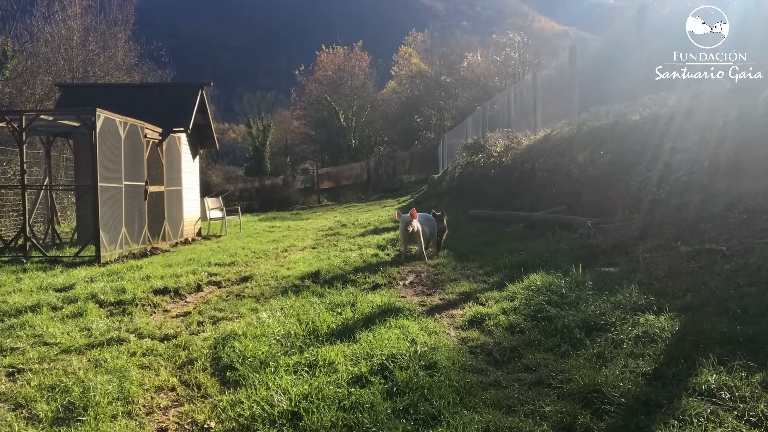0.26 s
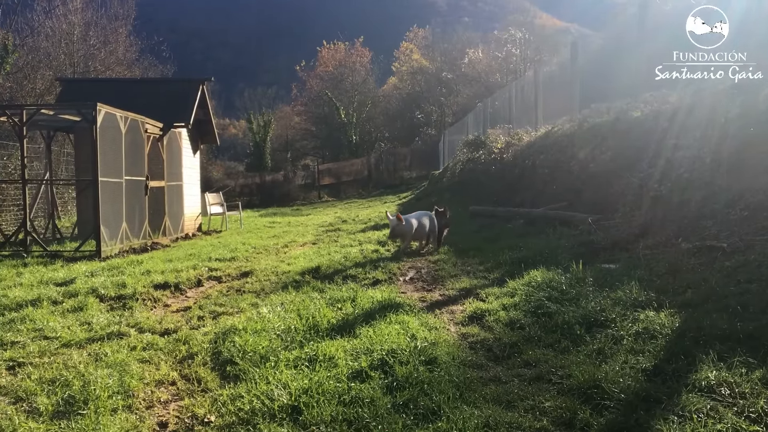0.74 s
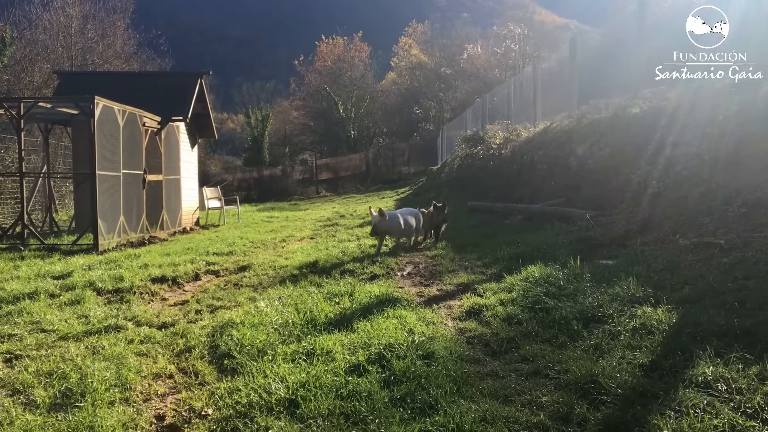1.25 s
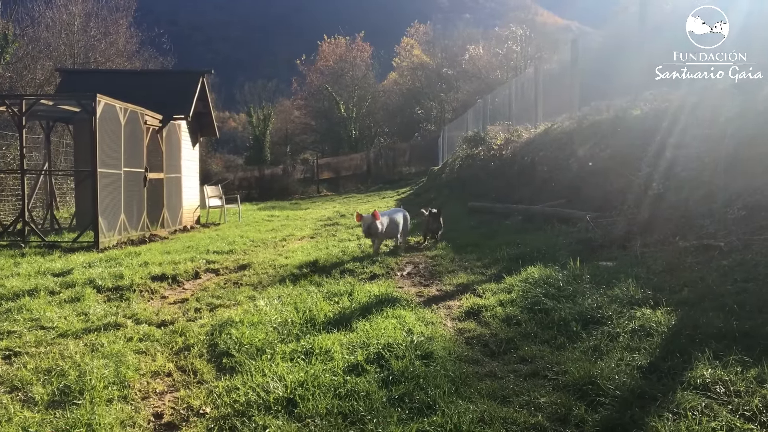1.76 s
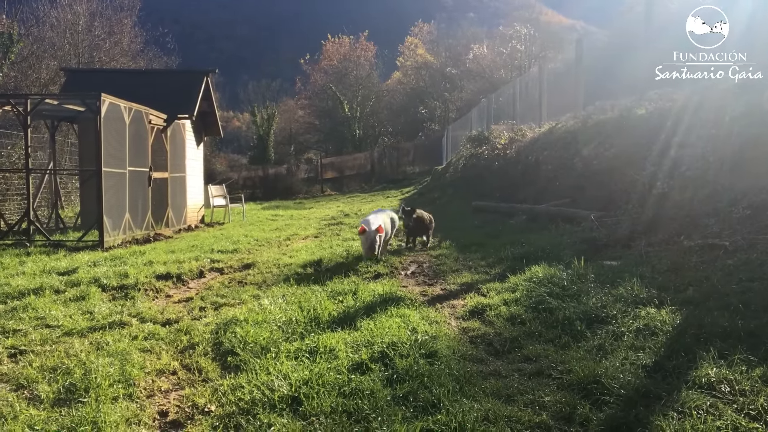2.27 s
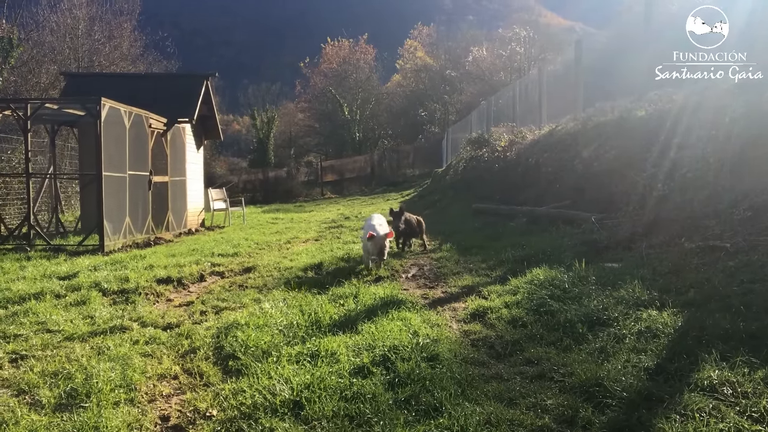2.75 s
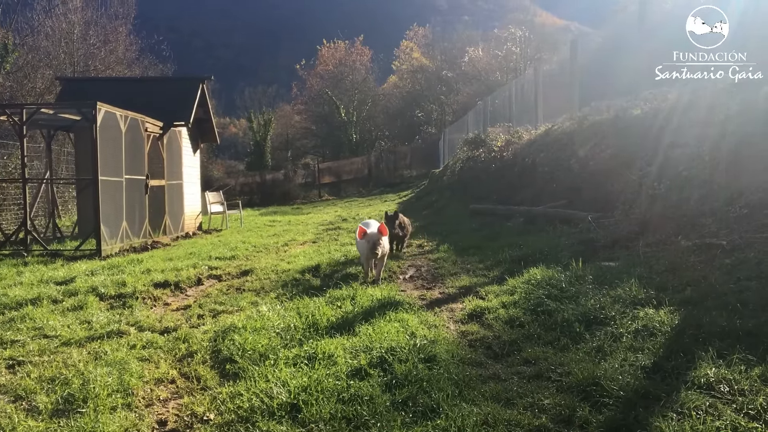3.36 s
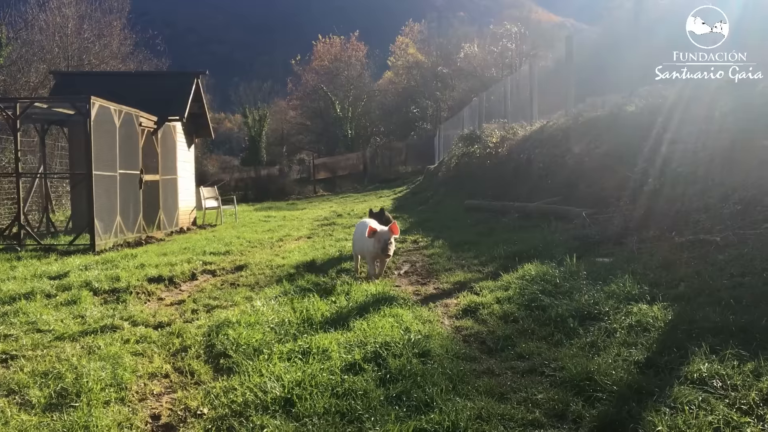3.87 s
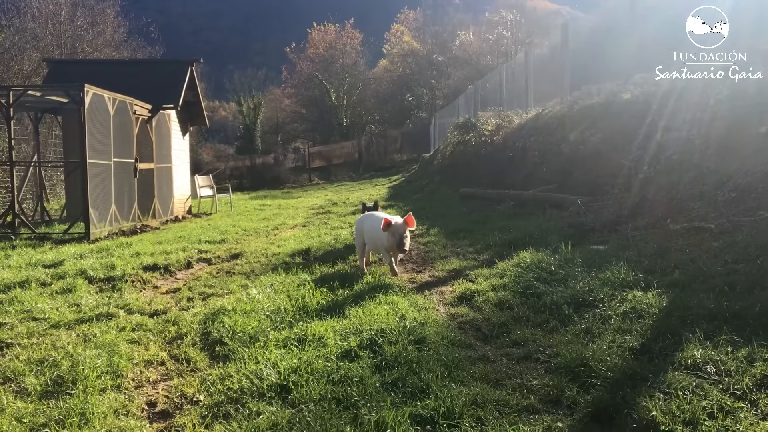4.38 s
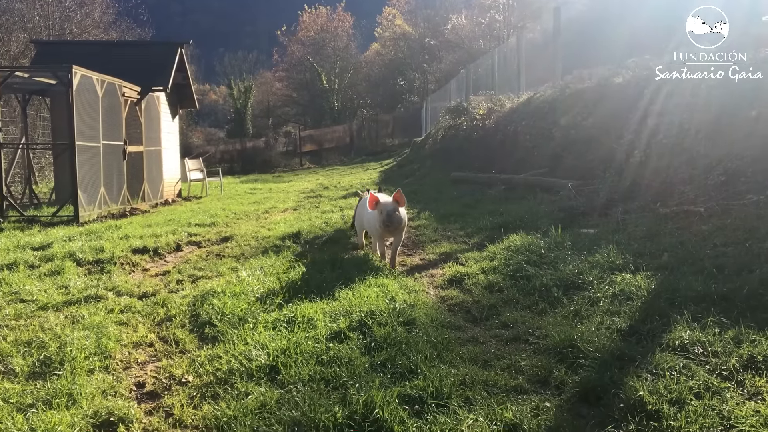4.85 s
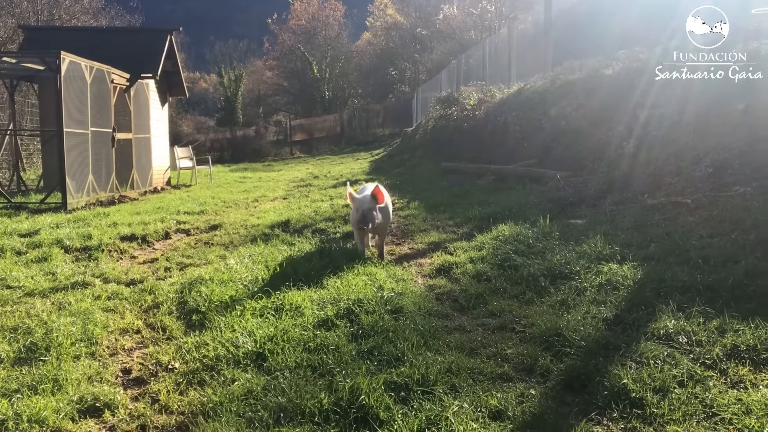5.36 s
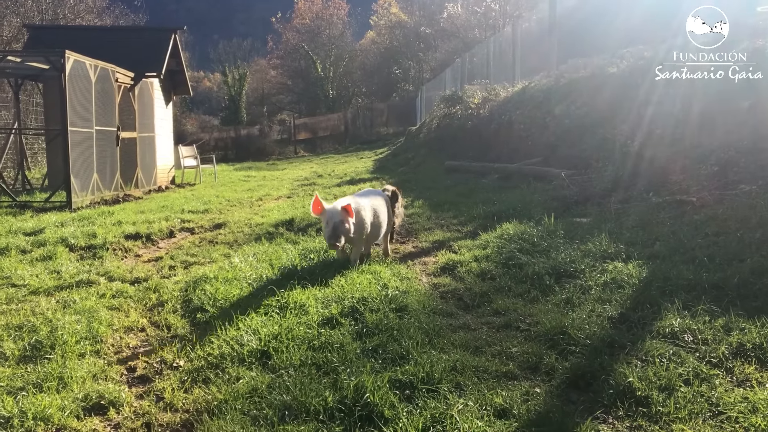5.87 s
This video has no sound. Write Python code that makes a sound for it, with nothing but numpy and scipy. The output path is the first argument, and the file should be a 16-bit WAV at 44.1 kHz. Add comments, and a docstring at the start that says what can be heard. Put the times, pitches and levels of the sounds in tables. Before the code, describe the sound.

Soft, steady outdoor air fills a quiet paddock, and a distant livestock bell clanks faintly at the start. From about 0.7 seconds, close handling noise takes over: fingers thump, clack and rub on the microphone's case, a sleeve brushes past, and movement adds low rumble. The knocks come in irregular clusters, stronger around 1.1, 2 and 2.7 seconds, with lighter clacks near 3.4 and the loudest, sharpest knock at 4.8. Grass crackles, crunches and snaps softly underfoot throughout, most between 4.3 and 4.8 seconds. A faint low hum swells at 1.2 and again at 2.5 seconds. The bell clanks at 1.3, then roughly every half second from 2.4 onward, with a thin outdoor echo. A far bird gives one very short, high whistle at 5 seconds. More rubbing and bumps close the sound at about 6 seconds.

```python
"""A quiet paddock, heard from a hand-held camera over soft outdoor air.
Close by, the grip shifts: fingers thump, clack and rub the case, a sleeve brushes it,
and the moving camera rumbles. Grass crackles, crunches and snaps underfoot.
A distant livestock bell clanks now and then, a low hum swells twice, and a bird calls once."""
import sys
import numpy as np
from scipy import signal
from scipy.fft import rfft, irfft
from scipy.io import wavfile
from scipy.ndimage import uniform_filter1d

SR = 44100
rng = np.random.default_rng(int(sys.argv[2]) if len(sys.argv) > 2 else 0)


def waveform_to_disk(signal):
    """Save audio, clipped to [-1, 1], as 16-bit WAV at the path in sys.argv[1]."""
    frames = np.transpose(np.atleast_2d(signal))
    scaled = np.clip(frames, -1, 1) * 32767
    samples = np.round(scaled).astype(np.int16)
    wavfile.write(sys.argv[1], SR, samples)


N = 269892
TIME = np.arange(N) / SR


def amp(db):
    return 10 ** (np.asarray(db) / 20)


def unit_rms(x):
    return x / np.sqrt(np.mean(x ** 2) + 1e-20)


def unit_burst(x):
    """Scales the loudest 3 ms to rms 1."""
    return x / np.sqrt(uniform_filter1d(x ** 2, 132, mode="constant").max())


def add(mix, start_s, sound):
    part = mix[max(round(start_s * SR), 0):][:len(sound)]
    part += sound[:len(part)]


def colour(x, spectrum):
    """Filters by (f/Hz, level/dB) points; rms 1."""
    hz, db = np.transpose(spectrum)
    bin_hz = np.fft.rfftfreq(len(x), 1 / SR)
    gain = amp(np.interp(np.log(bin_hz + 1), np.log(hz + 1), db))
    return unit_rms(irfft(rfft(x) * gain, len(x)))


def resonate(x, hz, width_hz):
    return signal.lfilter(*signal.iirpeak(hz, hz / width_hz, fs=SR), x)


def drift(cutoff_hz):
    """Low-passed noise, rms 1."""
    passband = np.fft.rfftfreq(N, 1 / SR) < cutoff_hz
    return unit_rms(irfft(rfft(rng.standard_normal(N)) * passband, N))


def slips(per_s, spread_db):
    """Random impulses, a few of them large; rms 1."""
    size = amp(spread_db * np.minimum(rng.exponential(1, N), 3))
    return unit_rms(size * rng.choice([-1, 1], N) * (rng.random(N) < per_s / SR))


def swell(length_s):
    """Half-sine envelope."""
    return np.sin(np.pi * np.arange(0, length_s, 1 / SR) / length_s)


def strokes(table, db_column=2):
    """Gain curve of power-summed swells; rows begin (mid t/s, length/s)."""
    power = np.zeros(N)
    for row in table:
        mid_s, length_s = row[:2]
        add(power, mid_s - length_s / 2, (amp(row[db_column]) * swell(length_s)) ** 2)
    return np.sqrt(power)


# Air spectrum: f/Hz, level/dB
AIR_SPECTRUM = [(15, -48), (28, -18.5), (44, 1.5), (66, -3), (289, -8.5), (427, -17.5), (1040, -16),
                (1900, -19), (2700, -27), (3400, -24.5), (4800, -31.5), (9000, -35), (15500, -37.5)]

def air(level_db=-65, waver_db=0.36):
    """Soft, nearly steady outdoor air."""
    noise = colour(rng.standard_normal(N), AIR_SPECTRUM)
    return amp(level_db + waver_db * drift(cutoff_hz=8.1)) * noise


# Bell modes: f/Hz, level/dB, t60/s
BELL_MODES = [(746, -1, 0.68), (753, -2.5, 0.21), (1920, -24, 0.45), (3440, -13, 0.29)]
# Clapper strikes: t/s, level/dB
BELL_STRIKES = [(.116, -59.5), (1.29, -58), (2.44, -55), (2.99, -57.5), (3.45, -53.5), (4.02, -59),
                (4.26, -55), (4.63, -56.5), (4.98, -60.5), (5.50, -57), (5.98, -61.5)]

def bell(rise_s=0.0018):
    """A clapper strikes a distant sheet-metal bell."""
    out, t = np.zeros(N), np.arange(SR) / SR
    for start_s, db in BELL_STRIKES:
        ring = sum(amp(mode_db - 60 * t / t60_s) * np.sin(2 * np.pi * (hz * t + rng.random()))
                   for hz, mode_db, t60_s in BELL_MODES)
        add(out, start_s, amp(db) * ring * (1 - np.exp(-t / rise_s)))
    return out


def valley(x, wet_db=-9, t60_s=1.0):
    """Slopes and trees scatter far sounds into a thin tail."""
    t = np.arange(SR) / SR
    tail = rng.standard_normal(SR) * amp(-60 * t / t60_s)
    return x + amp(wet_db) * signal.fftconvolve(x, tail / np.linalg.norm(tail))[:N]


# Grass spectrum: f/Hz, level/dB
GRASS_SPECTRUM = [(1500, 4), (3500, 3), (6000, 0.5), (9300, 1), (10400, -4), (11400, 0.5), (15500, -4.5)]
# Steady rustle: t/s, level/dB
RUSTLE_CURVE = [(.5, -78.5), (.73, -81), (.8, -70.5), (1.8, -76), (2.3, -71), (4.1, -71), (4.6, -67),
                (4.95, -74.5), (6.12, -69)]
# Crushed tufts: mid t/s, length/s, level/dB
TUFT_CRUNCHES = [(.824, 0.065, -65.5), (.947, 0.23, -64.5), (1.13, 0.2, -70), (1.301, 0.029, -67.5),
                 (1.568, 0.069, -67), (1.98, 0.067, -64.5), (2.2, .08, -75), (2.49, 0.24, -67.5),
                 (2.624, 0.073, -63), (2.953, 0.035, -66), (3.136, 0.14, -68.5), (3.34, .22, -66.5),
                 (4.34, 0.19, -60), (4.7, 0.2, -64), (5.57, 0.056, -64), (5.75, 0.18, -64),
                 (5.95, 0.33, -68)]
# Snapping stalks: t/s, relative level/dB
STALK_SNAPS = [(1.176, -54.5), (1.6513, -56), (1.956, -57), (2.035, -68), (2.212, -60), (2.3054, -55.5),
               (2.7813, -59), (2.9966, -53.5), (3.5617, -54), (3.737, -63), (3.8322, -56), (3.856, -54),
               (4.317, -52), (4.492, -56), (4.674, -51), (4.7203, -67), (4.768, -46.5), (4.81, -47.5),
               (4.893, -64), (5.017, -55.5), (5.102, -61.5), (5.392, -60), (5.503, -55.5), (5.7395, -53)]

def grass(shifting_db=1.3, flicker_db=2.1, snap_gain_db=-1.5, snap_s=0.00092):
    """Blades crackle under shifting feet, tufts crunch, single stalks snap."""
    rustle_db = np.interp(TIME, *np.transpose(RUSTLE_CURVE), left=-120)
    rustle = amp(rustle_db + shifting_db * drift(cutoff_hz=12))
    weight = np.hypot(rustle, strokes(TUFT_CRUNCHES))
    crackle = colour(slips(per_s=3500, spread_db=3.0), GRASS_SPECTRUM)
    out = weight * crackle * amp(flicker_db * drift(cutoff_hz=50))
    t = np.arange(SR // 50) / SR
    for start_s, db in STALK_SNAPS:
        crack = colour(rng.standard_normal(len(t)), GRASS_SPECTRUM) * t * np.exp(-t / snap_s)
        add(out, start_s, amp(db + snap_gain_db) * unit_burst(crack))
    return out


# Upper case modes: f/Hz, level/dB, t60/s
CASE_MODES = [(663, 4, 0.01), (900, 3, 0.018), (1070, 2.5, 0.022), (1390, 4.5, 0.01), (1800, 9, 0.0058),
              (2400, 4, 0.0065), (3240, 5.5, 0.0056), (4540, -1, 0.01), (5900, 7, 0.0038)]

def grit():
    """Tiny slips under the fingers, each ringing one case mode."""
    out, t = np.zeros(N), np.arange(SR // 40) / SR
    for hz, db, t60_s in CASE_MODES:
        ring = amp(db - 60 * t / t60_s) * np.sin(2 * np.pi * hz * t) / np.sqrt(hz)
        out += signal.oaconvolve(slips(per_s=90, spread_db=4.0), ring)[:N]
    return unit_rms(out)


# Scrape spectrum: f/Hz, level/dB
SCRAPE_SPECTRUM = [(240, -62), (400, -1), (495, -16), (669, 6), (758, 9.5), (870, -9), (1040, 7),
                   (1760, -3.5), (1890, 1.5), (3450, -10.5), (4910, -21), (8000, -22), (10400, -52),
                   (17600, -120)]
# Grip slides: mid t/s, length/s, relative scrape level/dB, relative drone level/dB
GRIP_SLIDES = [(.68, 0.17, -67.5, -68), (.87, 0.28, -58.5, -48.5), (1.0, 0.13, -56.5, -51.5),
               (1.15, 0.11, -58, -44), (1.36, 0.32, -56, -48.5), (1.57, .15, -57.5, -51.5),
               (1.70, 0.3, -64.5, -62), (1.99, 0.2, -61.5, -43), (2.19, 0.41, -60, -52),
               (2.48, 0.27, -56.5, -54.5), (2.71, 0.18, -60.5, -67), (2.82, 0.2, -86, -50),
               (3.0, 0.15, -52, -54.5), (3.35, 0.24, -54.5, -54.5), (3.55, 0.071, -57, -53),
               (3.77, 0.17, -87, -56.5), (3.93, 0.2, -65.5, -51.5), (4.29, 0.14, -60.5, -56),
               (4.54, 0.59, -63, -54), (4.72, 0.11, -68, -53.5), (4.83, 0.092, -59, -51.5),
               (4.98, .1, -61.5, -64), (5.19, 0.23, -65.5, -74), (5.35, 0.17, -62, -58),
               (5.85, 0.27, -57.5, -45), (5.99, 0.15, -55.5, -47)]

def rubbing(scrape_db=-2.5, grit_db=-4, drone_db=-0.5, pressure_db=3,
            creep_from_s=0.76, creep_to_s=5.45, creep_scrape_db=-69.5, creep_drone_db=-67):
    """Cloth and skin stick and slip on the case: gritty scrape, droning low mode."""
    pressure = amp(pressure_db * drift(cutoff_hz=74))
    friction = colour(slips(per_s=6000, spread_db=1.0), SCRAPE_SPECTRUM)
    scrape = amp(scrape_db) * friction + amp(grit_db) * grit()
    drone = resonate(rng.standard_normal(N), hz=287.3, width_hz=65.5)
    drone = unit_rms(resonate(drone, hz=229, width_hz=67))
    # The grip creeps faintly between slides.
    creep = uniform_filter1d(1. * ((TIME > creep_from_s) & (TIME < creep_to_s)), size=2000)
    scrape_gain = np.hypot(strokes(GRIP_SLIDES, db_column=2), amp(creep_scrape_db) * creep)
    drone_gain = np.hypot(strokes(GRIP_SLIDES, db_column=3), amp(creep_drone_db) * creep)
    return pressure * scrape_gain * scrape + amp(drone_db) * drone_gain * drone


# Rumble spectrum: f/Hz, level/dB
RUMBLE_SPECTRUM = [(20, -60), (40, -22), (65, -14), (90, -9), (140, -12.5), (200, -7.5), (400, -28.5),
                   (900, -55)]
# Camera sways: mid t/s, length/s, level/dB
CAMERA_SWAYS = [(.86, 0.087, -52), (1.12, 0.15, -49), (2.05, 0.7, -58.5), (3.655, 0.023, -49),
                (4.48, 0.31, -50.5), (5.99, 0.26, -56)]

def rumble(slide_gain_db=-11):
    """The moving camera rumbles: strongly on sways, a little on grip slides."""
    motion = np.hypot(strokes(CAMERA_SWAYS), amp(slide_gain_db) * strokes(GRIP_SLIDES))
    return motion * colour(rng.standard_normal(N), RUMBLE_SPECTRUM)


# Sleeve swipes: mid t/s, length/s, level/dB, centre f/Hz
SLEEVE_SWIPES = [(0.774, 0.048, -52, 1320), (2.157, 0.086, -57, 1590), (2.449, 0.019, -53, 2150),
                 (2.482, 0.041, -51.5, 2430), (2.993, 0.043, -64, 1760), (3.039, 0.058, -61.5, 2120),
                 (3.142, 0.093, -52.5, 1300), (3.304, 0.039, -54, 1410), (3.392, 0.045, -54.5, 1910),
                 (4.494, 0.023, -54, 3550), (4.959, 0.091, -57.5, 1390), (5.86, .07, -65, 2010),
                 (5.953, 0.042, -58.5, 2400)]

def sleeve(width_oct=0.6, floor_db=-30, catch_db=2.5):
    """The weave brushes past and catches: fluttering hiss, each swipe in its own band."""
    out, grid_hz = np.zeros(N), np.geomspace(200, 16000, 25)
    for mid_s, length_s, db, centre_hz in SLEEVE_SWIPES:
        envelope = swell(length_s)
        band = np.exp(-.5 * (np.log2(grid_hz / centre_hz) / width_oct) ** 2) + amp(floor_db)
        hiss = colour(rng.laplace(size=len(envelope)), np.c_[grid_hz, 20 * np.log10(band)])
        add(out, mid_s - length_s / 2, amp(db) * envelope * hiss)
    return out * unit_rms(amp(catch_db * drift(cutoff_hz=290)))


# Low case modes: f/Hz, level/dB, t60/s
THUMP_MODES = [(273.7, 0.5, 0.062), (205.6, -12.5, 0.046)]
# Finger knocks: t/s, thump level/dB, clack level/dB, clack centre f/Hz
FINGER_KNOCKS = [(0.799, -30, -53.5, 990), (.821, -29.5, -43, 1020), (.891, -32.5, -67, 1000),
                 (.933, -31, -43.5, 1060), (1.015, -26.5, -56, 1000), (1.092, -21, -45, 1000),
                 (1.122, -30.5, -52, 800), (1.134, -42, -47, 745), (1.213, -29.5, -58, 800),
                 (1.25, -30, -47.5, 965), (1.318, -21.5, -55, 1400), (1.353, -49, -51, 2030),
                 (1.433, -31, -56, 1400), (1.488, -33.5, -49, 740), (1.519, -44, -46, 1000),
                 (1.544, -33.5, -72, 1000), (1.662, -38, -37, 970), (1.678, -47, -42.5, 1400),
                 (1.743, -38.5, -38, 1070), (1.884, -28, -71, 1400), (1.902, -59, -53.5, 1420),
                 (1.958, -17, -43, 1430), (1.977, -27, -35.5, 1130), (1.984, -18.5, -40.5, 1200),
                 (2.208, -30, -40, 1260), (2.309, -41, -42.5, 1690), (2.544, -40, -49, 780),
                 (2.617, -33, -50, 800), (2.686, -30, -40, 1100), (2.692, -16.5, -42, 1360),
                 (2.712, -16, -35, 1030), (2.797, -31.5, -66, 1370), (2.817, -35, -60, 1400),
                 (2.836, -48, -58.5, 1600), (2.863, -33.5, -47.5, 940), (2.925, -37, -60, 1390),
                 (2.985, -42, -53, 1800), (3.218, -41.5, -50, 1020), (3.262, -38, -40.5, 980),
                 (3.324, -59, -45.5, 1600), (3.338, -33.5, -39.5, 1070), (3.394, -34, -43.5, 1500),
                 (3.438, -31.5, -37.5, 1470), (3.497, -38.5, -42, 1010), (3.511, -45, -44.5, 990),
                 (3.738, -32.5, -47, 2270), (3.746, -30, -59, 1000), (3.861, -33, -54.5, 900),
                 (3.916, -29, -48, 1230), (4.246, -39.5, -62, 1000), (4.284, -44.5, -49.5, 2020),
                 (4.333, -46, -45, 920), (4.612, -32, -73, 1000), (4.638, -35, -76, 1000),
                 (4.769, -15, -25.5, 1810), (5.235, -45, -46, 830), (5.322, -35, -48, 850),
                 (5.382, -46, -54.5, 1060), (5.719, -37.5, -50, 820), (5.794, -28.5, -55, 1000),
                 (5.985, -31.5, -45, 1300), (6.063, -32.5, -66, 1000)]

def thumps(lag_s=0.002, rise_s=0.0034, push_db=2.0, push_s=0.00034, grip_detune=0.051):
    """A fingertip pushes the case, which swings briefly in its lowest modes."""
    out, t = np.zeros(N), np.arange(SR // 6) / SR
    push = amp(push_db) * (1 - t / push_s) * np.exp(1 - t / push_s)
    attack = 1 - np.exp(-t / rise_s)
    for contact_s, db, _, _ in FINGER_KNOCKS:
        tuning = 1 + grip_detune * rng.uniform(-1.19, 1)
        ring = sum(np.sin(2 * np.pi * hz * tuning * t) * amp(mode_db - 60 * t / t60_s)
                   for hz, mode_db, t60_s in THUMP_MODES)
        add(out, contact_s + lag_s, -amp(db) * (ring + push) * attack)
    return out


def clacks(width_oct=0.83, grip_detune=0.15, graze_s=0.0023,
           chatter=0.088, chatter_s=0.009, chatter_slope=0.89, ordinary_db=-45):
    """Surfaces graze, meet and chatter; each clack rings the case modes around its own centre pitch."""
    out, t = np.zeros(N), np.arange(SR // 20) / SR
    mode_hz, mode_db, t60_s = np.array(CASE_MODES).T[:, :, None]
    polarity = (-1) ** np.arange(len(mode_hz))[:, None]
    since_contact_s = t - t[len(t) // 10]
    envelope = np.exp(-abs(since_contact_s) / np.where(since_contact_s < 0, graze_s, chatter_s))
    for contact_s, _, db, centre_hz in FINGER_KNOCKS:
        hz = mode_hz * np.exp(grip_detune * rng.uniform(-1, 1, mode_hz.shape))
        weight = polarity * np.exp(-.5 * (np.log2(hz / centre_hz) / width_oct) ** 2)
        ring = (weight * amp(mode_db - 60 * t / t60_s) * np.sin(2 * np.pi * hz * t)).sum(0)
        looseness = chatter * amp(chatter_slope * (ordinary_db - db))  # firm blows chatter less
        force = (since_contact_s == 0) + looseness * rng.standard_normal(len(t)) * envelope
        clack = unit_burst(signal.fftconvolve(force, ring))
        add(out, contact_s + since_contact_s[0], amp(db) * clack)
    return out


# Hum swells: mid t/s, length/s, level/dB
HUM_SWELLS = [(1.2, .5, -68), (2.52, .62, -57)]

def hum(hz=69, width_hz=16):
    """A narrow, wavering low hum."""
    band = resonate(rng.standard_normal(N), hz, width_hz)
    return strokes(HUM_SWELLS) * unit_rms(resonate(band, hz, width_hz))


def bird(start_s=5.002, level_db=-61, hz=4150, length_s=0.044, fade_db_per_s=160):
    """One short, fading whistle at constant pitch."""
    out, t = np.zeros(N), np.arange(0, length_s, 1 / SR)
    envelope = amp(level_db - fade_db_per_s * t) * signal.windows.tukey(len(t), .15)
    add(out, start_s, envelope * np.sin(2 * np.pi * hz * t))
    return out


def scene():
    """Air, grass and handling close by, a low hum, bell and bird far off; mono."""
    near = air() + grass() + rubbing() + rumble() + sleeve() + thumps() + clacks()
    return (near + hum() + valley(bell() + bird()))[None]


def record(dry, cutoff_hz=15580):
    """Steep low-pass."""
    lowpass = signal.firwin(511, cutoff_hz, window=("kaiser", 9), fs=SR)
    return signal.oaconvolve(dry, lowpass[None], "same")


dry = scene()
out = record(dry)
waveform_to_disk(out)
```